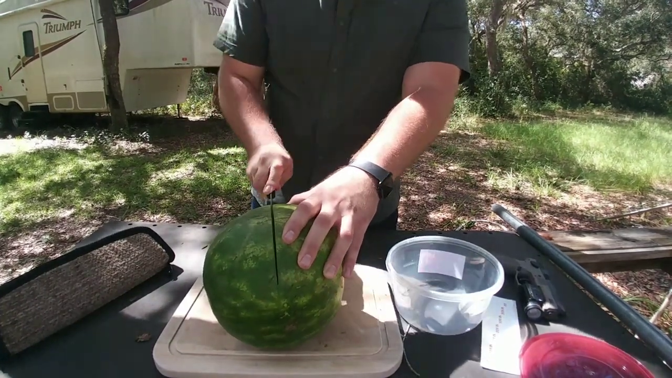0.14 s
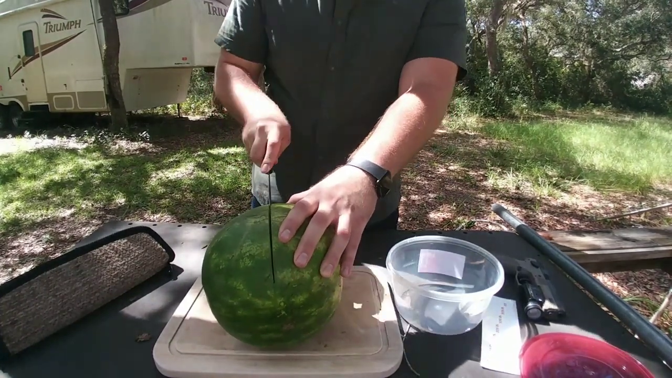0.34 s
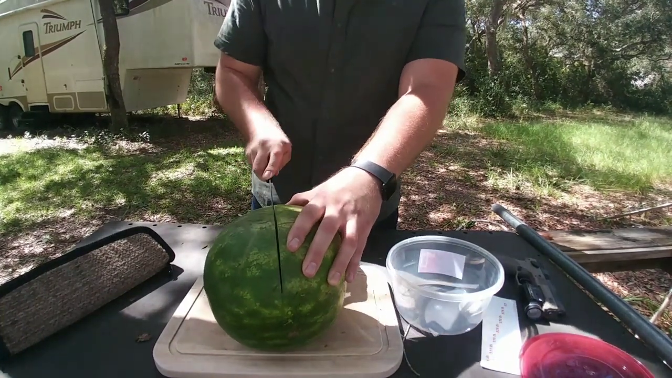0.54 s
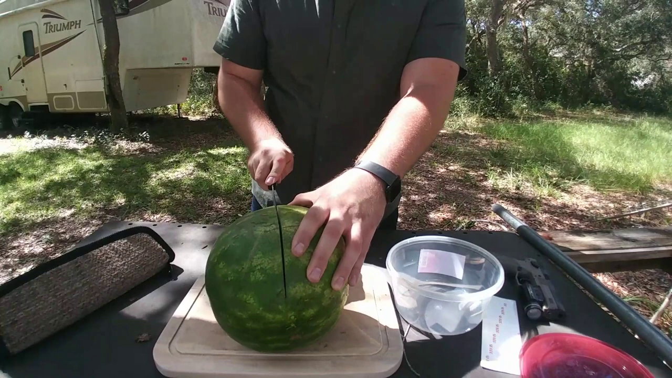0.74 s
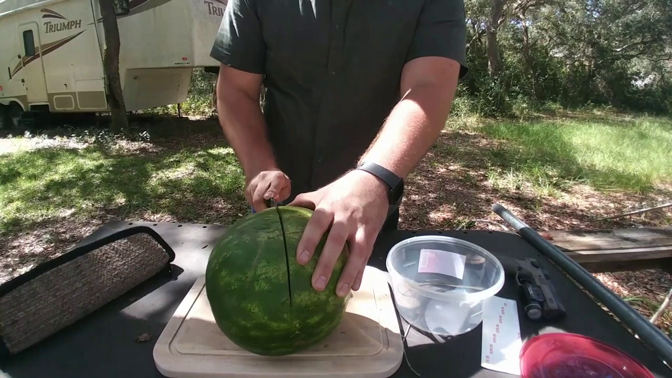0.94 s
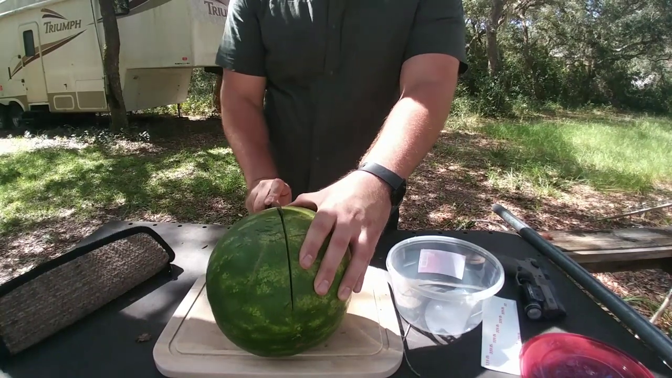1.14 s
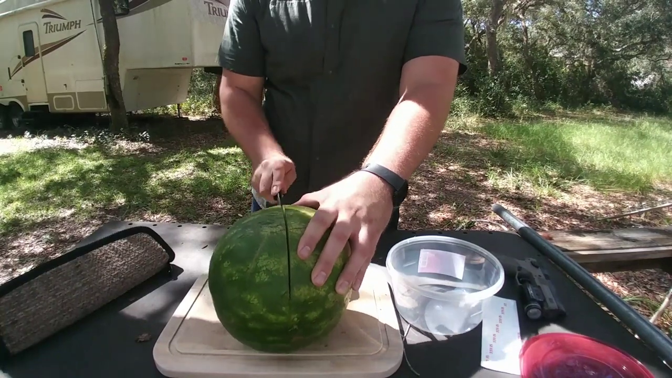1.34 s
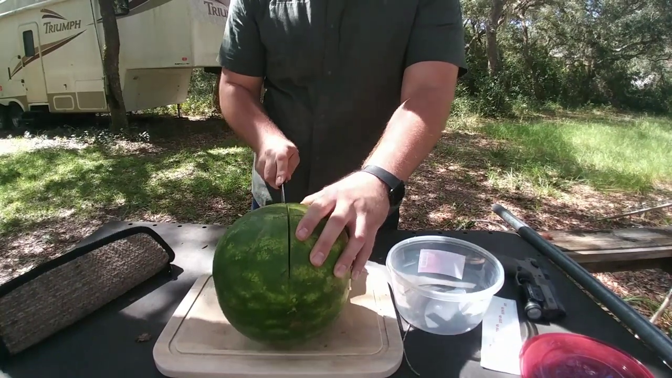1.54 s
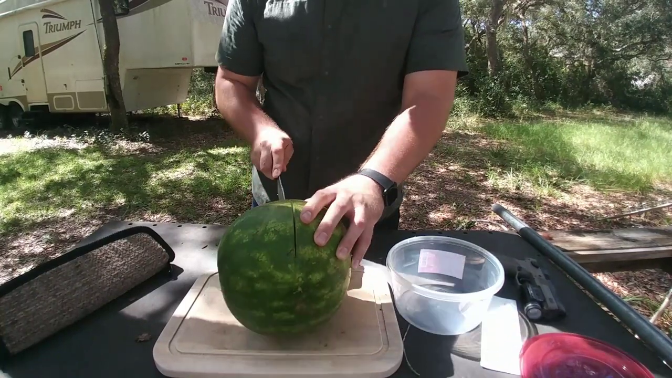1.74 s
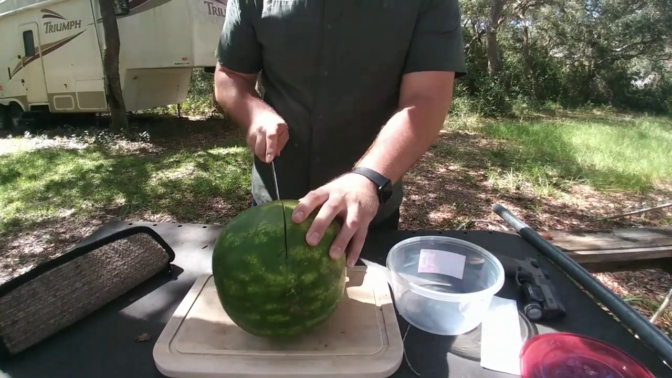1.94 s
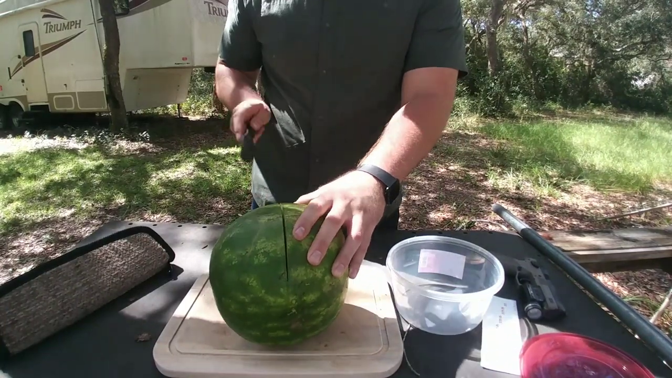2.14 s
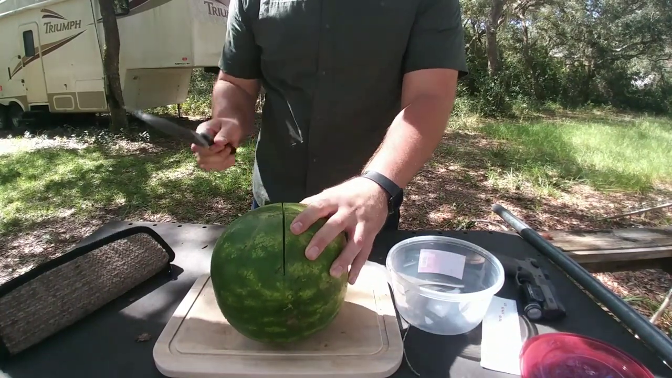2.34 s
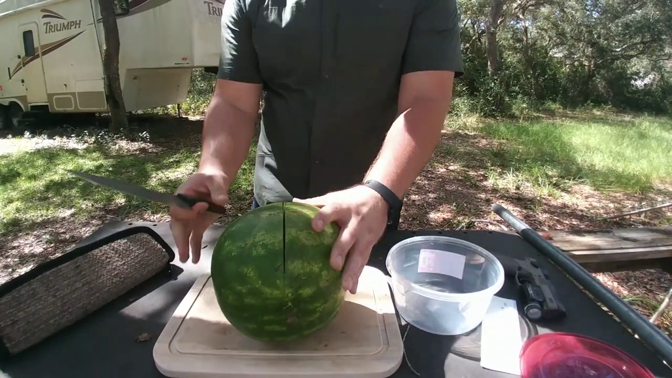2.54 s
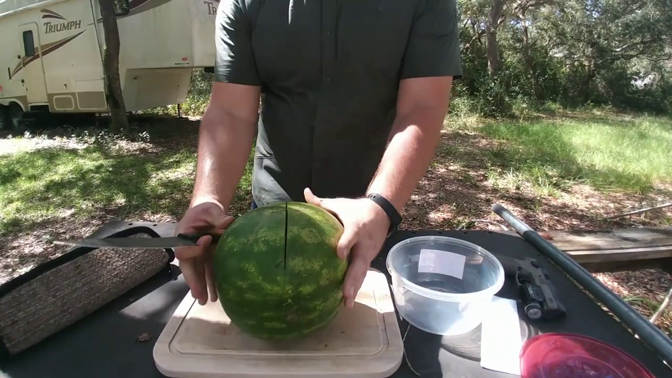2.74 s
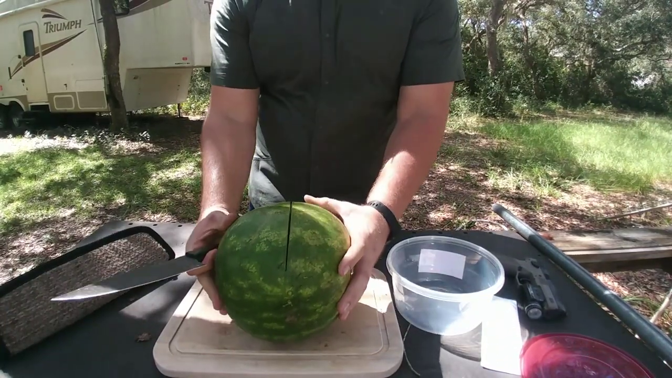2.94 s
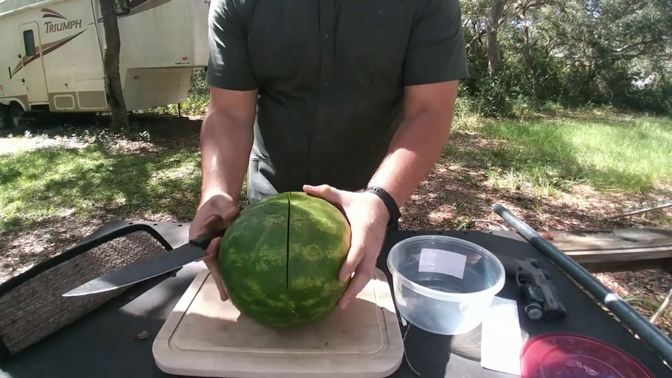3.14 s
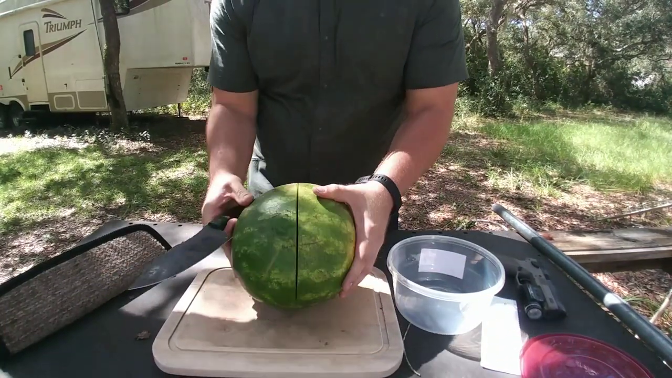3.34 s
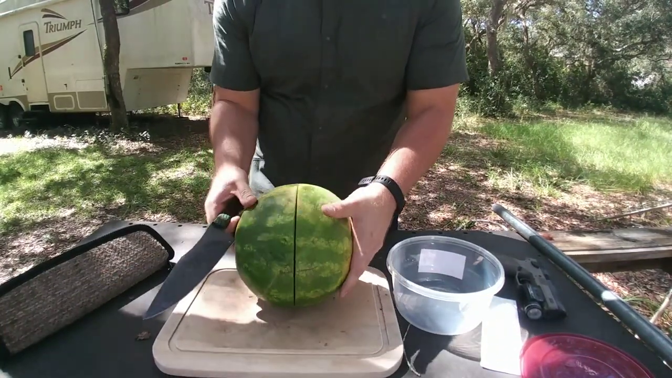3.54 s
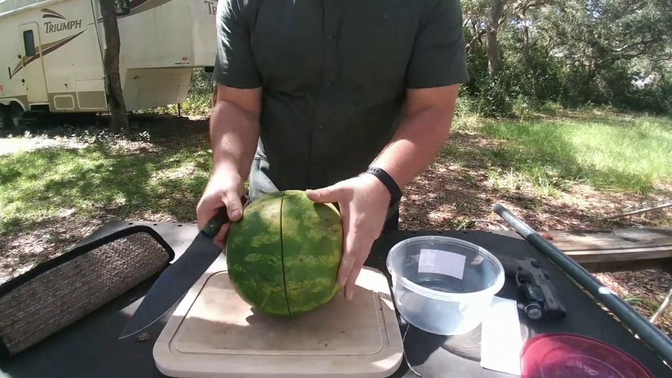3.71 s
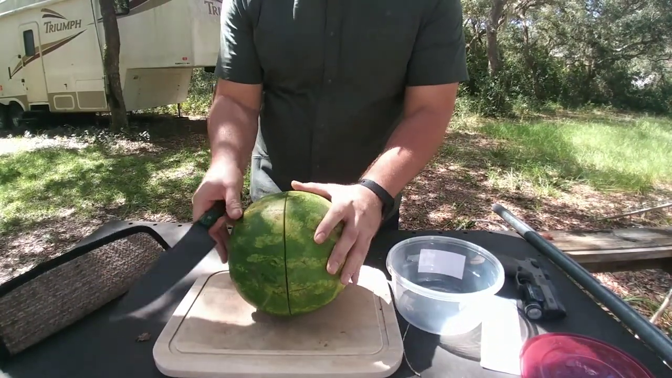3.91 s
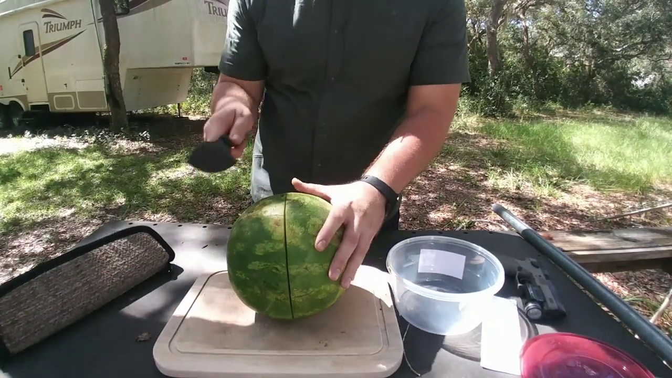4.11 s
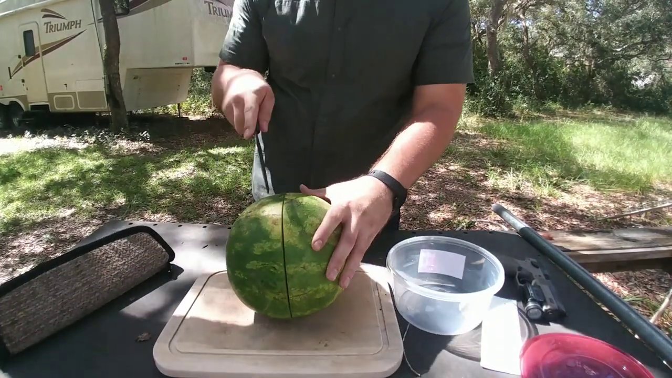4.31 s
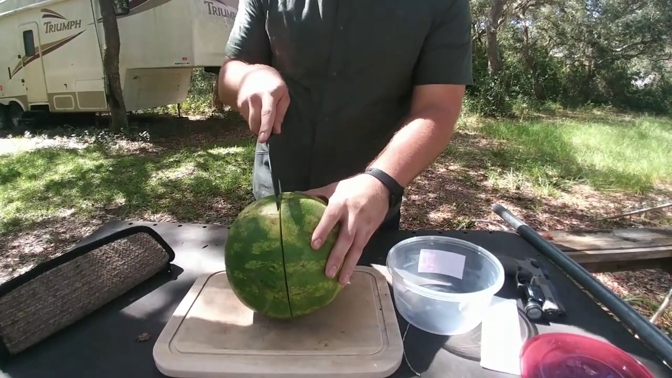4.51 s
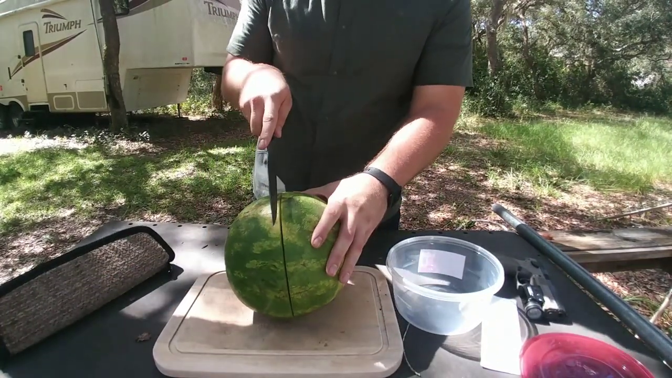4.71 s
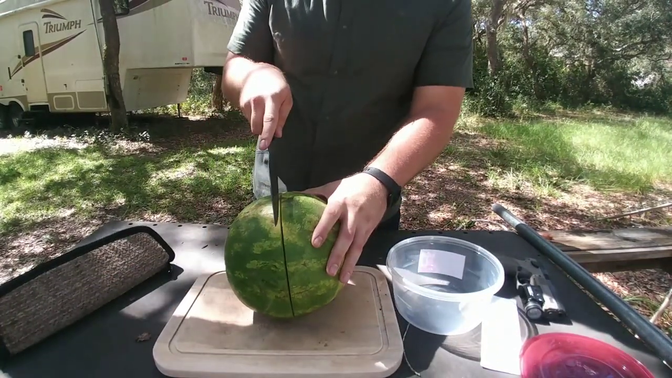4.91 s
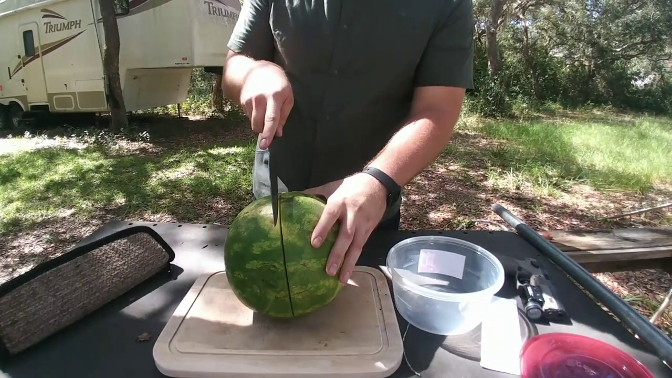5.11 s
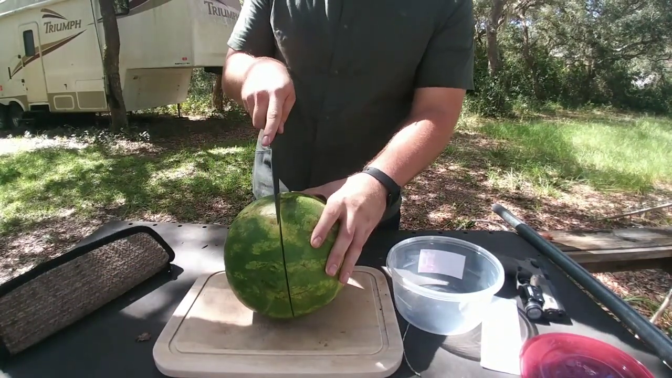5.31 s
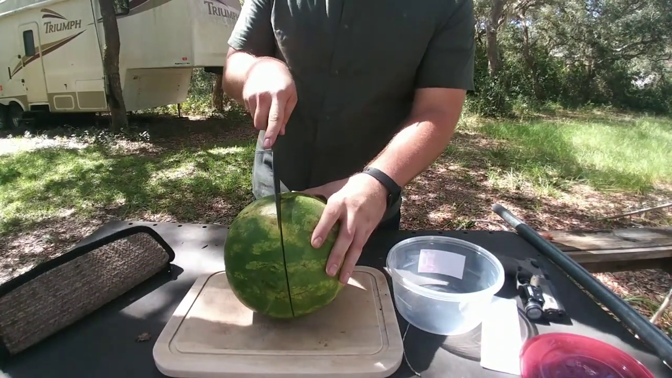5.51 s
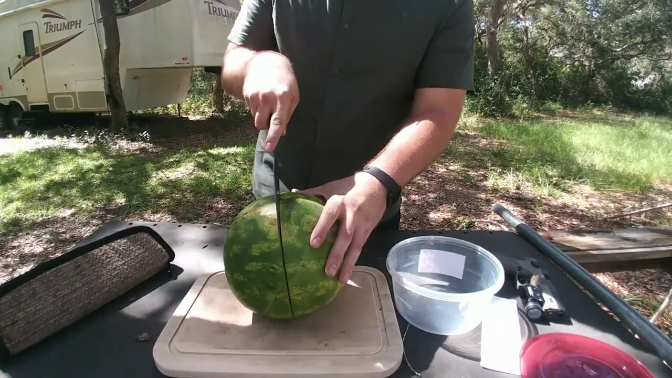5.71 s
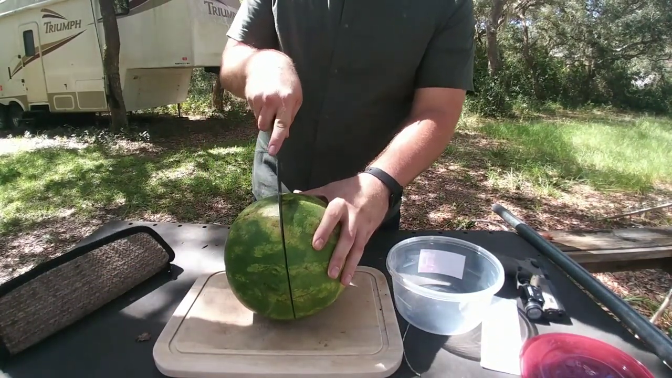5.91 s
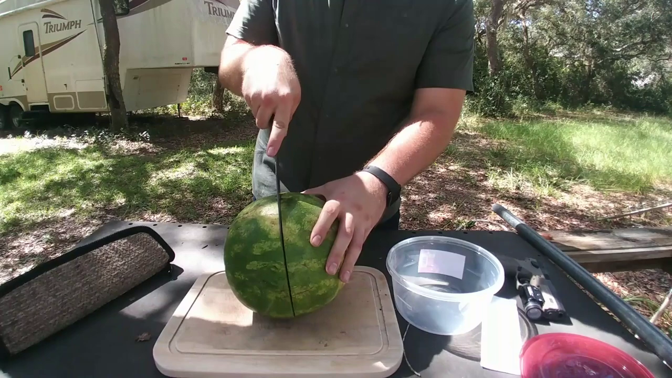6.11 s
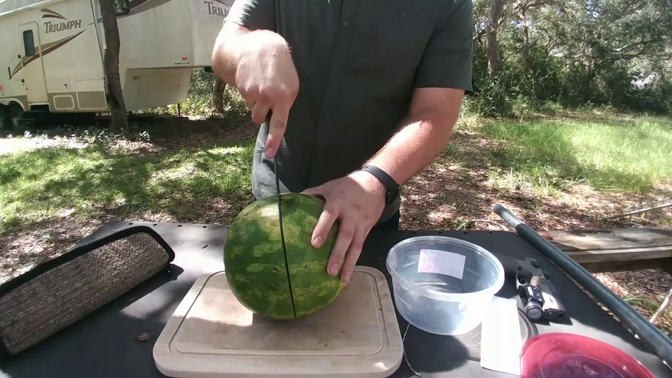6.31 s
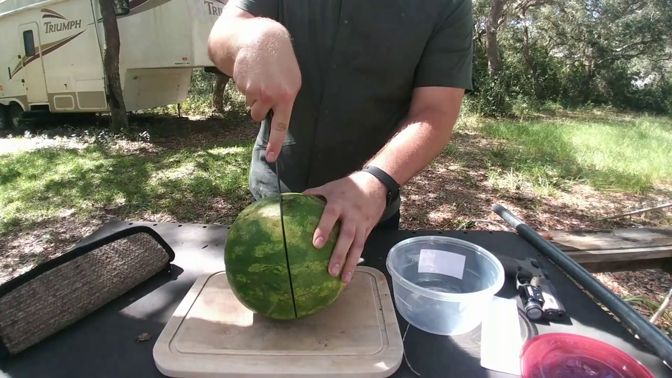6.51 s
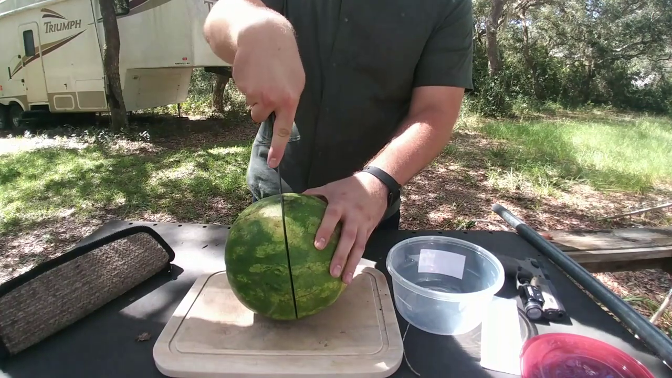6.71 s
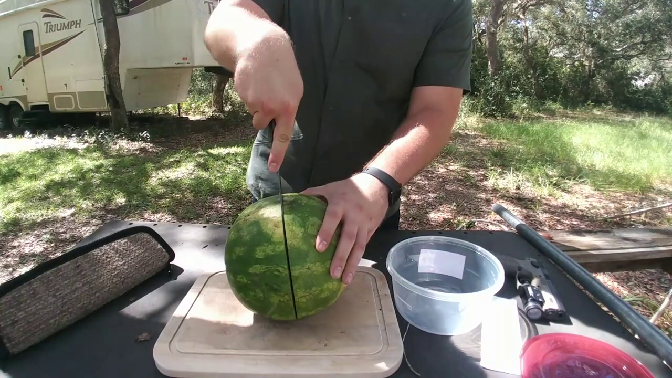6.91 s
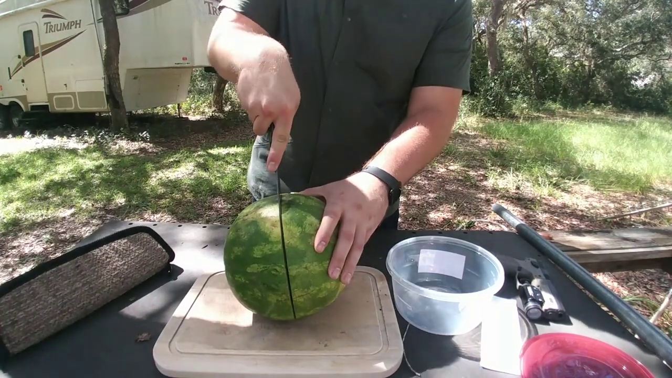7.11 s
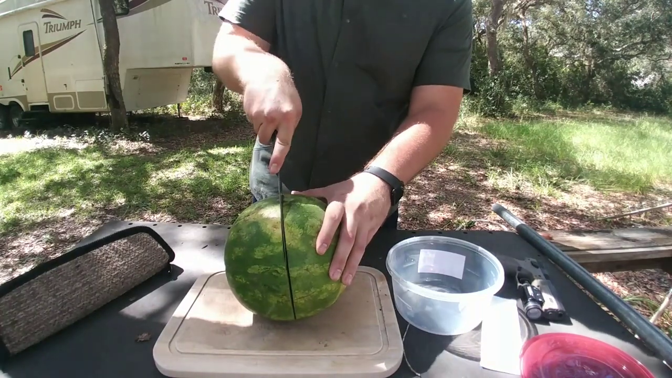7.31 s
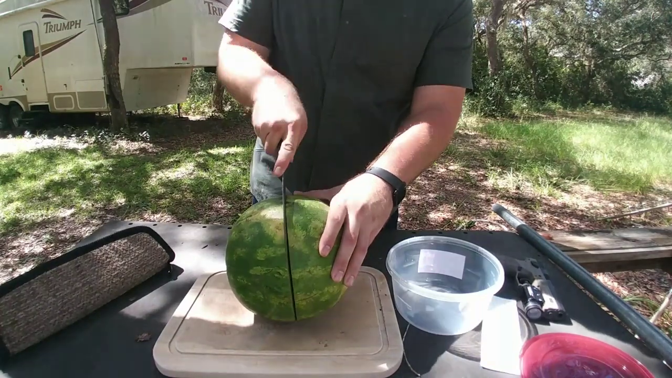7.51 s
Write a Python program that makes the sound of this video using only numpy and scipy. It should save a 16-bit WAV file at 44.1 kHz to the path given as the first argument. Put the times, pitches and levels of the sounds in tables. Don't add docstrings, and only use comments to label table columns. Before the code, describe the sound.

Outdoors, shrill crickets trill in turns while a blade rasps through tough rind, then a heavy melon clacks and thuds onto a board.

```python
import sys
import numpy as np
from scipy import signal
from scipy.fft import rfft, irfft
from scipy.io import wavfile
from scipy.ndimage import uniform_filter1d

SR = 44100
rng = np.random.default_rng(int(sys.argv[2]) if len(sys.argv) > 2 else 0)


def volts(x):
    e = np.asarray(x, float) / 20
    return 10 ** e


def int16_out(signal):
    q = np.round(np.clip(np.atleast_2d(signal).T, -1, 1) * 32767)
    wavfile.write(sys.argv[1], SR, q.astype(np.int16))


N = 332955
TIME = np.arange(N) / SR

# (frequency [Hz], density [dB per Hz])
YARD_SPECTRUM = [(30, -30.5), (48, 2), (70, -10.5), (110, -6), (150, -13), (230, -9.5), (290, -15),
                 (420, -21), (800, -23), (1600, -26.5), (4500, -31.5), (6500, -30), (9500, -27),
                 (15500, -34)]
YARD_DB = -67.5
# (time [s], level [dB])
BREEZE = [(0, 0.5), (1.5, 2.5), (2.4, 1.5), (3.2, 2.5), (4.4, 0.56), (5.3, 0), (6.5, 0.6), (7.55, 3.5)]
# (time [s], level [dB])
TABLE_SHAKE = [(0, -65.5), (.25, -64), (.5, -79.5), (1.19, -68), (1.3, -70.5), (1.7, -66), (2.5, -74.5),
               (3.25, -65), (4.0, -64.5), (4.8, -71), (6.0, -63), (6.45, -62), (7.02, -56), (7.55, -61.5)]
TABLE_HZ, TABLE_T60_S = 77.12, 0.091

# (wing tone [Hz], stroke rate [1/s], fall in a stroke [Hz], stroke length [s])
CRICKETS = [(7075, 56, 674, 0.00798), (7600, 63.7, 620, 0.0042), (8318, 65.3, 743, 0.0045)]
# (start [s], stop [s], level [dB])
TRILLS = [
    [(-.3, .45, -73), (.66, 1.0, -68), (1.08, 1.45, -75), (1.45, 1.92, -66), (2.15, 2.85, -67.5),
     (3.25, 3.92, -62.5), (4.28, 5.44, -66.5), (5.72, 6.32, -66.5), (6.68, 7.4, -62.5)],
    [(-.1, .9, -63), (1.13, 1.9, -63.5), (2.18, 2.92, -63), (3.2, 4.15, -64), (4.45, 5.2, -62.5),
     (5.2, 5.62, -82), (5.62, 6.31, -62), (6.66, 7.35, -62)],
    [(.46, .9, -64.5), (1.47, 1.95, -63), (2.49, 2.96, -63.5), (3.72, 4.15, -66.5), (4.68, 5.22, -63.5),
     (5.79, 6.31, -62.5), (6.72, 7.2, -62.5)],
]
# (swell [s], dying [s], sag [dB/s], starting flatness [share], warm-up [s])
TRILL_SHAPES = [(0.298, 0.0238, 1.5, 0.034, 0.32), (0.257, 0.06, 6, 0.055, .4),
                (0.102, 0.0089, 6, 0.064, 0.18)]
CHORUS_DB = -78

# (start [s], length [s], body [dB], rasp [dB], hiss [dB])
CUTS = [(-.03, 0.1763, -53, -55, -62), (0.104, 0.0414, -44.5, -57.5, -77), (0.295, 0.0527, -79, -59, -79.5),
        (0.89, 0.153, -55.5, -68, -71), (1.005, 0.142, -54, -63, -66), (1.16, 0.061, -52, -63, -64.5),
        (1.696, 0.096, -82, -67.5, -67.5), (1.847, 0.12, -78, -66.5, -68.5),
        (2.104, 0.0965, -67, -68, -76.5), (5.796, 0.0803, -69, -72, -61.5),
        (5.93, 0.0483, -70, -66.5, -64.5), (6.083, 0.0242, -70.5, -67.5, -67.5),
        (6.21, 0.0655, -67, -71, -70.5), (6.518, 0.063, -64.5, -73, -74.5), (6.743, 0.066, -65, -70, -64.5),
        (6.977, 0.0813, -59.5, -63, -57.5), (7.444, .12, -68.5, -75, -80)]
# (start [s], length [s], body [dB], rasp [dB], hiss [dB])
RUBS = [(0.18, 0.295, -80, -70.5, -66), (0.485, 0.144, -80, -77, -64.5), (.69, 0.196, -73, -72.5, -72),
        (1.94, 0.154, -79.5, -74, -66), (2.396, 0.024, -85.5, -70.5, -63.5),
        (2.596, 0.373, -85.5, -76.5, -67.5), (3.065, 0.108, -68, -73, -71.5),
        (3.16, 0.0793, -78.5, -68, -57.5), (3.27, .11, -60, -74, -66), (3.39, 0.01, -61.5, -66, -68),
        (3.47, .1, -64, -72, -72), (1.3, .25, -76, -72, -80), (3.415, 0.0193, -69.5, -60, -52),
        (3.676, 0.0594, -56.5, -55.5, -52.5), (3.743, 0.097, -49, -77, -55),
        (3.822, 0.135, -64.5, -86.5, -60.5), (4.044, 0.04, -77, -93.5, -65.5),
        (4.26, 0.0454, -82.5, -75.5, -69), (6.1, 0.191, -71.5, -78, -82), (6.4, 0.402, -69, -80, -85),
        (7.17, 0.086, -58.5, -65.5, -72.5), (7.26, 0.0684, -59, -71, -65), (7.383, 0.205, -61, -75, -82.5)]
CUT_ATTACK_S, CUT_RELEASE_S, RUB_ATTACK_S, RUB_RELEASE_S = 0.0242, 0.0447, 0.0216, 0.0386
# (frequency [Hz], width [Hz], level [dB])
MELON_BODY = [(150, 50.8, 3.5), (221.5, 37.5, 0.5), (438, 86, -1)]
# (frequency [Hz], width [Hz], level [dB])
RASP_BANDS = [(720, 215, 5), (1094, 120, -3), (1262, 288, 4), (1601, 126, -3), (1962, 81, -13),
              (2920, 6400, -13.5), (4790, 70, 0)]
# (frequency [Hz], width [Hz], level [dB])
HISS_BANDS = [(6330, 8400, -5.5), (9400, 3930, 9), (12240, 12400, 0.5)]

# (time [s], peak [dB], colour [Hz])
SNAPS = [(.146, -41, 835), (.33, -51.5, 1050), (.013, -45.5, 230), (.275, -54.5, 150), (6.922, -54, 4500),
         (0.187, -49, 5000), (0.894, -50.5, 492), (0.945, -44, 466), (0.964, -45.5, 478), (1.004, -50, 450),
         (1.036, -46, 240), (1.035, -48, 1235), (1.235, -54, 1100), (1.111, -63, 1250), (1.135, -49, 1290),
         (3.033, -54.5, 4500), (3.167, -50.5, 3720), (4.655, -54, 2610), (6.921, -51.5, 2250),
         (7.496, -59.5, 4500)]
# (time [s], peak [dB])
TICKS = [(0.4442, -49.5), (0.5265, -48), (0.5672, -48.5), (0.6867, -49), (0.795, -52), (0.989, -48),
         (1.2605, -53.5), (1.3932, -51), (1.5206, -46.5), (1.6893, -48.5), (2.069, -47.5), (2.5191, -51),
         (3.027, -46), (3.032, -48.5), (3.109, -49), (3.12, -47.5), (3.1536, -38.5), (3.1976, -49),
         (3.2247, -43), (4.0518, -49.5), (4.0741, -47.5), (4.283, -51.5), (4.6544, -49.5), (6.7515, -51),
         (6.7994, -53), (6.92, -43.5), (7.083, -45), (7.1406, -49.5), (7.373, -50), (7.484, -55)]
TICK_HZ = 9840

# (start [s], length [s], from [Hz], to
# [Hz], level [dB])
SQUEAKS = [(1.48, .03, 1250, 960, -74), (1.505, .032, 900, 735, -65), (1.548, .02, 500, 430, -68),
           (1.685, .055, 545, 705, -67), (1.742, .02, 745, 880, -57), (1.768, .075, 985, 1235, -71),
           (1.67, .05, 1465, 1860, -72), (1.744, .02, 1550, 1700, -69.5), (1.78, .025, 1950, 2150, -76),
           (1.9, .026, 640, 750, -61), (1.195, .06, 1910, 1990, -74), (2.04, .09, 2170, 2195, -77),
           (2.19, .035, 2110, 2090, -78), (2.188, .02, 4150, 4170, -77), (2.31, .022, 2070, 2060, -78),
           (3.424, .024, 1910, 1915, -63), (3.5, .07, 256, 250, -64), (3.88, .09, 1960, 1940, -76),
           (6.47, .22, 2030, 2140, -84), (6.982, .02, 525, 460, -58), (7.056, .035, 440, 452, -60),
           (.166, .028, 152, 140, -47), (1.192, .022, 145, 140, -50), (1.217, .026, 140, 138, -49),
           (1.19, .045, 450, 445, -63), (1.3, .9, 102, 98, -71.5), (1.695, .04, 820, 860, -71)]

# (start [s], length [s], level [dB])
DRAGS = [(2.137, 0.0166, -54), (2.158, 0.0125, -50.5), (3.4965, 0.0071, -45), (3.513, 0.0165, -52),
         (3.528, 0.008, -43), (3.539, 0.0102, -54.5), (3.552, 0.00855, -52), (3.644, 0.055, -58),
         (3.661, 0.029, -72), (4.337, 0.018, -67.5)]
# (frequency [Hz], level [dB], t60 [s])
BLADE_MODES = [(3794, -24, 0.04), (4290, -19.5, 0.0315), (5000, -21.5, 0.033), (5910, -23.5, .035),
               (6499, -5.5, 0.045), (8018, -4, 0.038), (8370, -10.5, 0.017), (9360, 2, 0.0187),
               (8840, -12, 0.023), (10080, -4, 0.0177), (10980, -2.5, 0.0114), (12630, -7.5, 0.038),
               (13500, -22, .025)]

# (time [s], peak [dB], contact sharpness [Hz], table thump [dB])
BLOWS = [(3.223, -46.5, 1540, -74), (3.3085, -19, 5600, -31.5), (3.322, -37.5, 1190, -44),
         (3.341, -40.5, 1500, -32.5), (3.39, -34, 1590, -38.5), (3.675, -37.5, 1990, -37.5),
         (3.684, -35.5, 5000, -29.5), (3.697, -33.5, 2500, -27.5), (3.704, -30, 2000, -43),
         (3.7164, -26, 3000, -22), (3.7227, -10, 12800, -34.5), (3.7277, -27.5, 1315, -28.5),
         (3.74, -24, 6500, -22.5), (3.744, -33.5, 3500, -42), (3.752, -51, 2500, -36),
         (3.76, -31.5, 2400, -32.5), (3.766, -40.5, 2000, -37.5), (3.776, -38.5, 3000, -26),
         (3.795, -39.5, 2980, -37), (3.803, -37.5, 3480, -24), (3.808, -42, 5000, -45.5),
         (3.844, -42.5, 3970, -53), (3.883, -44, 3450, -41), (3.911, -53, 2000, -58.5),
         (6.117, -55.5, 1200, -60.5), (6.991, -46, 1490, -54.5), (7.082, -39.5, 5000, -38.5),
         (7.175, -48, 1500, -50), (7.208, -51, 500, -52), (7.273, -51.5, 700, -54.5),
         (7.506, -54, 500, -46), (7.535, -47, 500, -43)]
# (frequency [Hz], level [dB], t60 [s])
BOARD_MODES = [(142, 8, 0.096), (234.1, -6, 0.25), (309.8, -5, 0.22), (421, 1.5, 0.095), (522, 1.5, 0.152),
               (635, -16, 0.235), (756, -0.5, 0.056), (2597, 10, 0.03), (1042, 3.5, 0.049),
               (1157, -2.5, 0.055), (1390, 4, 0.04), (1886, -1.5, 0.038), (2450, 9.5, 0.026),
               (2970, 1, 0.021), (3680, 6.5, 0.022), (4110, 5.5, 0.018), (4500, 1, 0.0164),
               (4970, 7.5, 0.016), (5600, 2.5, 0.0127), (6000, 7, 0.014), (7400, 3.5, 0.0091),
               (9400, 17, 0.007), (11600, -13.5, 0.0055)]
LANDS_S = 3.6
LANDED_T60_SHARE, LIFTED_T60_SHARE = 0.72, 0.52
# (time [s], frequency [Hz], level [dB], t60 [s])
RINGS = [(3.309, 775.5, -36.5, 0.118), (3.309, 1847, -30, 0.0412), (3.391, 758, -46, 0.053),
         (3.677, 720, -40.5, 0.061), (3.7235, 440.5, -31, 0.116), (3.725, 773, -26, 0.057),
         (3.757, 1161, -45.5, 0.089), (3.803, 2050, -50, 0.034)]


def unit(x):
    return x / np.sqrt(np.mean(x ** 2))


def band(x, hz, width_hz):
    return signal.lfilter(*signal.iirpeak(min(hz, .45 * SR), hz / width_hz, fs=SR), x)


def decay(t, t60_s):
    return np.exp(-np.log(1000) * t / t60_s)


def walk(rate_hz):
    k = int(SR / rate_hz)
    steps = np.repeat(rng.standard_normal(N // k + 1), k)
    return 1.3 * uniform_filter1d(uniform_filter1d(steps, k), k)[:N]


def grains(per_s, spread_db):
    hits = rng.random(N) < per_s / SR
    size_db = spread_db * np.minimum(rng.exponential(size=N), 3)
    return hits * rng.standard_normal(N) * volts(size_db)


def add(out, start_s, sound):
    i = int(start_s * SR)
    out[i:i + len(sound)] += sound[:N - i]


def held(start_s, stop_s, attack_s, release_s):
    rise = (TIME - start_s) / max(attack_s, .001)
    fall = 1 + (stop_s - TIME) / max(release_s, .001)
    return np.clip(np.minimum(rise, fall), 0, 1)


def yard():
    hz, db = np.transpose(YARD_SPECTRUM)
    f = np.maximum(np.arange(N // 2 + 1) * SR / N, 1)
    shape = volts(np.interp(np.log(f), np.log(hz), db))
    air = irfft(rfft(rng.standard_normal(N)) * shape, N)
    middle = signal.sosfilt(signal.butter(4, [120, 5000], "band", fs=SR, output="sos"), air)
    sway_db = np.interp(TIME, *np.transpose(BREEZE)) + walk(3.904) / 2
    return air * volts(YARD_DB + sway_db) / np.std(middle)


def shake():
    noise = rng.standard_normal(N)
    sway = unit(band(band(noise, TABLE_HZ + 3, 7.3), TABLE_HZ, 32))
    tremor = np.sin(2 * np.pi * np.cumsum(81 + 2.62 * walk(3)) / SR)
    level_db = np.interp(TIME, *np.transpose(TABLE_SHAKE))
    return volts(level_db) * unit(sway + 1.28 * tremor)


def trills(rows, swell_s, dying_s, sag_db_per_s, flat, warm_s):
    gain = volts(CHORUS_DB)
    for start, stop, db in rows:
        gain = gain + volts(db - sag_db_per_s * (TIME - start)) * held(start, stop, swell_s, dying_s)
    starts = np.array([-1] + [start for start, _, _ in rows])
    since_s = TIME - starts[np.searchsorted(starts, TIME) - 1]
    return gain * volts(1.37 * walk(9)), 1 - flat * np.exp(-since_s / warm_s)


def crickets():
    out = 0
    t = np.arange(SR // 12) / SR
    for (hz, rate_hz, fall_hz, length_s), rows, shape in zip(CRICKETS, TRILLS, TRILL_SHAPES):
        gain, warmth = trills(rows, *shape)
        strokes = np.cumsum(rate_hz * (1 + .006 * walk(6.0))) / SR
        since = (strokes % 1 - .5) / rate_hz / length_s
        chance = rng.standard_normal((N // 400, 2))[strokes.astype(int)].T
        wing_hz = 1.004 * hz * warmth * (1 + 0.009 * chance[0])
        tone_hz = wing_hz - fall_hz * np.clip(since, -1, 1)
        stroke_gain = volts(0.35 * chance[1]) * np.exp(-4 * since ** 2)
        chirp = stroke_gain * np.sin(2 * np.pi * np.cumsum(tone_hz) / SR)
        echoes = rng.standard_normal((2, len(t))) * np.exp(-t / .014)
        wet = sum(signal.fftconvolve(chirp * (1 + walk(40)), echo)[:N] for echo in echoes)
        out = out + gain * unit(unit(chirp) + 1.2 * unit(wet))
    return out


def effort(rows, attack_s, release_s):
    shapes = [held(s, s + length, attack_s, release_s) for s, length, *_ in rows]
    powers = volts(np.array(rows)[:, 2:].T) ** 2
    return np.sqrt(powers @ np.square(shapes))


def work():
    cut = effort(CUTS, CUT_ATTACK_S, CUT_RELEASE_S)
    rub = effort(RUBS, RUB_ATTACK_S, RUB_RELEASE_S)
    rasp_gain, hiss_gain = np.hypot(cut, rub)[1:]
    slips = unit(grains(450, 3.0)) + 0.706 * rng.standard_normal(N)
    fibres = unit(grains(2500, 0.47)) + 0.132 * slips
    skin = unit(grains(2700, 0.45)) + 0.5 * rng.standard_normal(N)
    push = cut[0] * unit(slips) + rub[0] * unit(skin)
    body = sum(volts(db) * band(band(push, hz, 1.49 * w), hz, 1.49 * w) for hz, w, db in MELON_BODY)
    body = volts(23.0) * body / np.linalg.norm(volts(np.array(MELON_BODY)[:, 2]))
    rasp = sum(volts(db) * band(fibres, hz, w) for hz, w, db in RASP_BANDS)
    hiss = sum(volts(db) * band(band(skin, hz, w), hz, 1.77 * w) for hz, w, db in HISS_BANDS)
    return body + rasp_gain * unit(rasp) + hiss_gain * unit(hiss)


def ticks():
    out, t = np.zeros(N), np.arange(SR // 40) / SR
    dry_ticks = [(s + 0.0016, db + 2.5, TICK_HZ) for s, db in TICKS]
    for s, peak_db, hz in [*dry_ticks, *SNAPS]:
        snap = 0.1895 * rng.standard_normal(len(t)) * np.exp(-t / (0.00174 + 1.96 / hz))
        snap[0] += 1
        snap = band(snap, hz, 0.191 * hz)
        add(out, s, volts(peak_db) * snap / np.abs(snap).max())
    return out


def squeaks():
    out, waver = np.zeros(N), 1 + walk(120) / 90
    for s, length_s, from_hz, to_hz, db in SQUEAKS:
        count = int(1.3 * length_s * SR)
        hz = np.linspace(from_hz, to_hz, count) * waver[int(s * SR):][:count]
        tone = np.sin(2 * np.pi * np.cumsum(hz) / SR)
        add(out, s, np.sqrt(2) * volts(db) * np.hanning(count) ** 0.37 * tone)
    return out * volts(3.2 * walk(90))


def blade():
    push = np.zeros(N)
    for s, length_s, db in DRAGS:
        stroke = np.linspace(0, 1, int(1.622 * length_s * SR))
        add(push, s, volts(db) * np.sin(np.pi * stroke ** 0.706))
    push = push * (rng.standard_normal(N) + 0.96 * unit(grains(670, 2.4)))
    sing = 0
    for hz, db, t60_s in BLADE_MODES:
        mode = band(push, hz, np.log(1000) / np.pi / t60_s)
        sing = sing + volts(db) * mode * np.sqrt(SR * t60_s / 30)
    scrape = volts(-21.5) * band(push, 4600, 12000)
    return sing + scrape


def blows():
    out, t = np.zeros(N), np.arange(int(.35 * SR)) / SR
    hz, db, t60_s = np.transpose(BOARD_MODES)[:, :, None]
    thump = np.sin(2 * np.pi * TABLE_HZ * t) * decay(t, TABLE_T60_S) * (1 - np.exp(-t / 0.00095))
    for s, peak_db, sharp_hz, thump_db in BLOWS:
        chance = rng.standard_normal((3, len(BOARD_MODES), 1))
        share = LANDED_T60_SHARE if s > LANDS_S else LIFTED_T60_SHARE
        phase = 2 * np.pi * hz * (1 + 0.011 * chance[1]) * t + 0.9 * chance[2] + np.pi
        modes = volts(db + 0.9 * chance[0]) * np.sin(phase)
        noise = rng.standard_normal(len(t))
        between = np.array([unit(band(noise, f, 0.48 * f)) for f in hz[:, 0]]) * volts(db - 2.0)
        sound = ((modes + between) * decay(t, t60_s * share)).sum(axis=0)
        sound[:4] -= 24.0
        softness = signal.butter(4, np.clip(sharp_hz, 300, 15000), fs=SR, output="sos")
        sound = signal.sosfilt(softness, sound)
        add(out, s, volts(peak_db) * sound / np.abs(sound).max() + volts(thump_db - 4.5) * thump)
    return out


def rings():
    out, t = np.zeros(N), np.arange(SR // 5) / SR
    for s, hz, db, t60_s in RINGS:
        tone = np.sin(2 * np.pi * hz * t) * decay(t, t60_s)
        add(out, s, volts(db) * tone * (1 - np.exp(-t / 0.00123)))
    return out


def scatter(near):
    t = np.arange(SR // 5) / SR
    echo = band(rng.standard_normal(len(t)), 900, 2200) * decay(t, 0.057) * (t > .004)
    return volts(-26.5) * signal.fftconvolve(near, echo / np.sqrt(np.sum(echo ** 2)))[:N]


def scene():
    near = work() + ticks() + squeaks() + blade() + blows() + rings()
    return (yard() + shake() + crickets() + near + scatter(near))[None]


def band_limit(x):
    return signal.sosfilt(signal.butter(12, 15720, fs=SR, output="sos"), x)


def record(dry):
    mix = signal.sosfilt(signal.butter(4, 44, "high", fs=SR, output="sos"), dry)
    return band_limit(mix)


dry = scene()
out = record(dry)
int16_out(out)
```